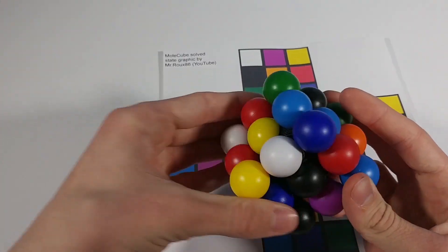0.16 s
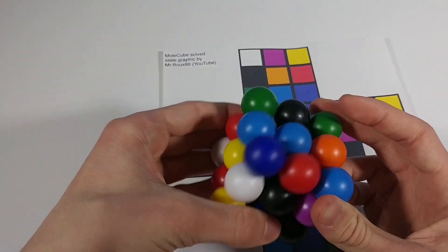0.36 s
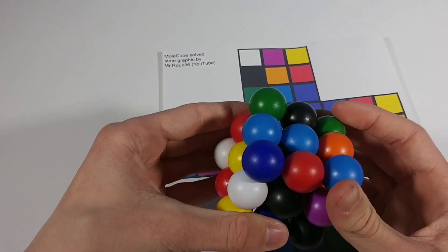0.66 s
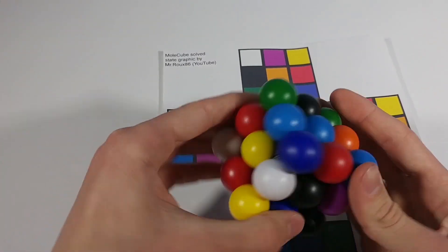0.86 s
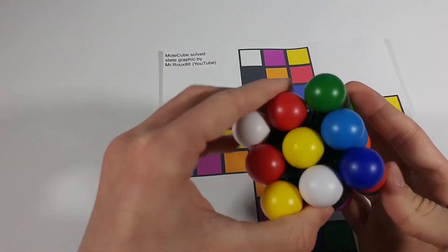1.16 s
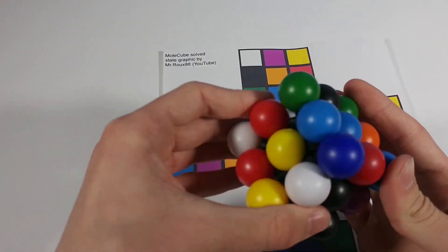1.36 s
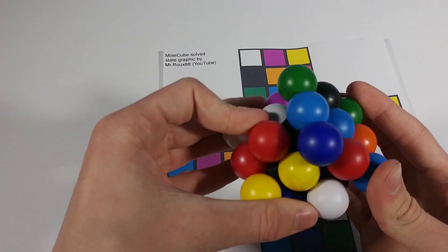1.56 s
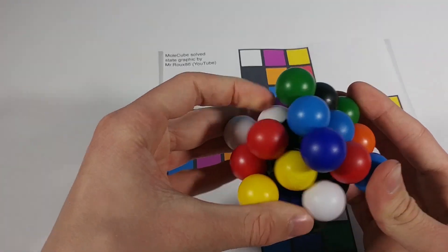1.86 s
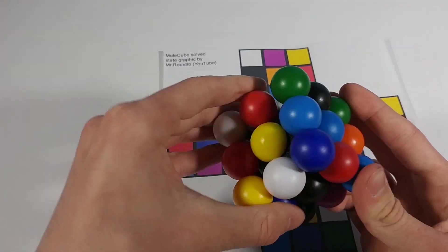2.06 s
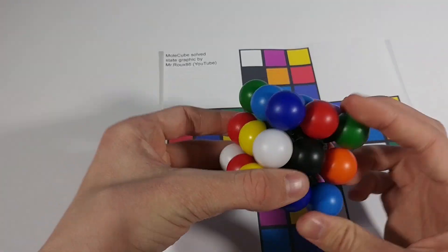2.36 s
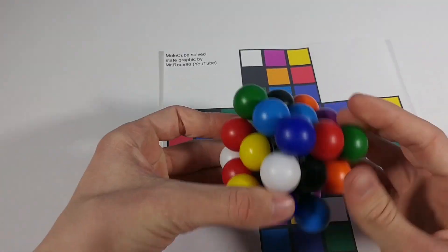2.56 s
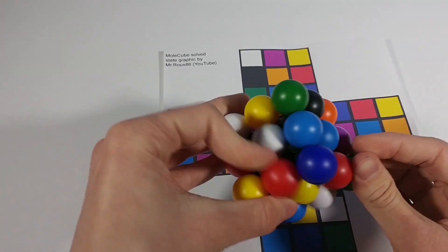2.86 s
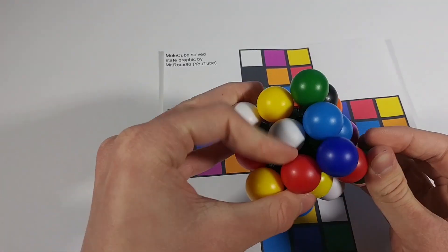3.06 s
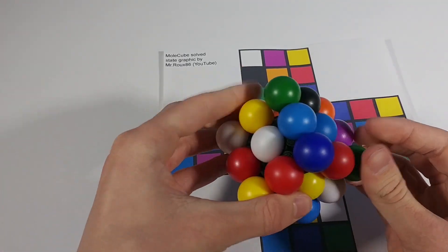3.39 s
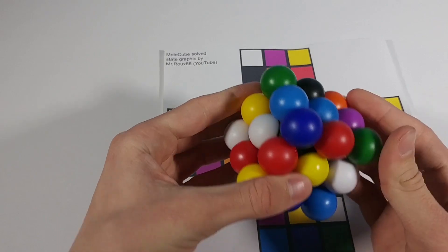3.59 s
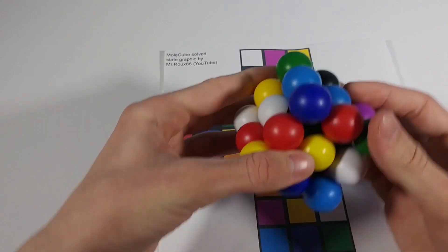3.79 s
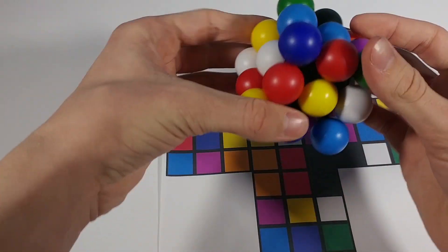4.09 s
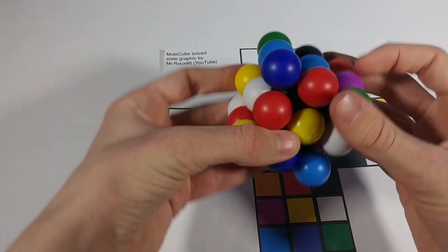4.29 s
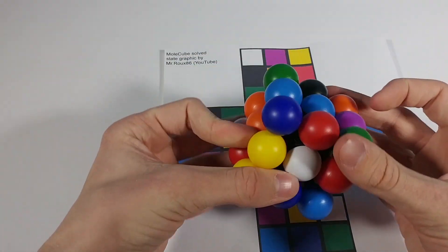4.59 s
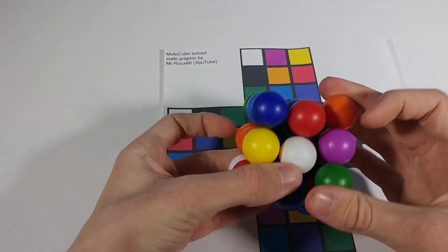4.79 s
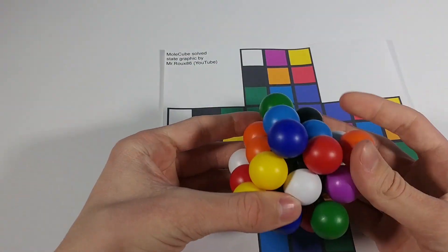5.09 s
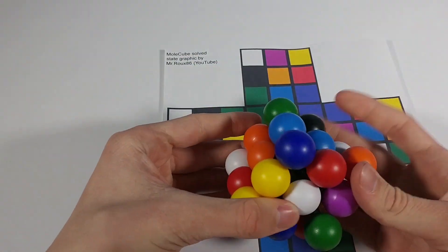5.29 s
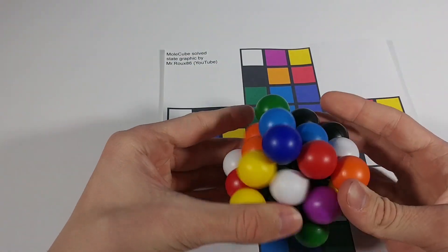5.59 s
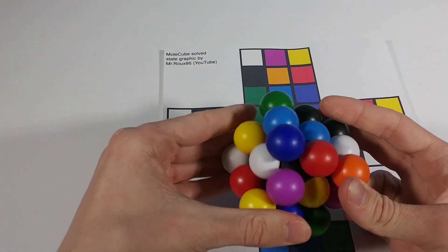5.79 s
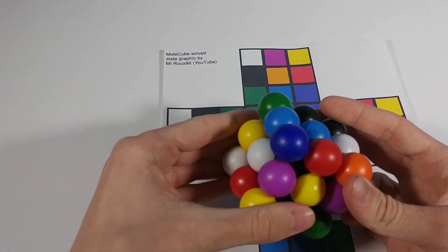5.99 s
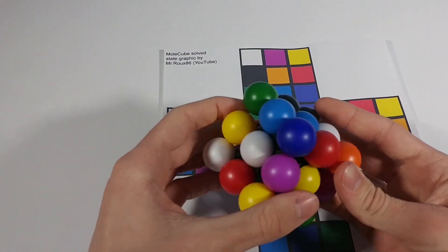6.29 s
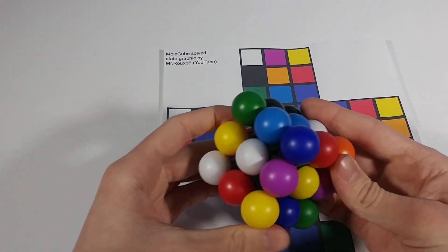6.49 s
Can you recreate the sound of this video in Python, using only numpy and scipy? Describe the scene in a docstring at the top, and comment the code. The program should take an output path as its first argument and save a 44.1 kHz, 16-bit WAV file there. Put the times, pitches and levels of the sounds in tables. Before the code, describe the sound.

Hands turn a puzzle of hollow plastic balls close to the microphone in a small room. Sharp double clicks and lighter ticks come in irregular bursts, densest around two to three seconds, then a lull with a skin-on-paper brush, a rattling cluster near four and a half seconds and a few later snaps. Low rumble swells under the first half.

```python
"""Twisty ball puzzle in two hands

A puzzle of hollow plastic balls is turned above a paper-covered table, close up in a small room. Turns end in
clusters of contacts: impacts plus chatter, filtered by hollow-ball resonances, with room echo. Between them,
shaped noise makes rubbing with tiny slips, grip bumps and short hisses, mostly skin on paper. Arm motion
rumbles table and stand in two low modes; fingertips thump; hiss and a faint hum lie below."""
import sys
import numpy as np
from scipy import signal
from scipy.fft import rfft, irfft, next_fast_len
from scipy.io import wavfile
from scipy.ndimage import map_coordinates

SR = 44100
rng = np.random.default_rng(int(sys.argv[2]) if len(sys.argv) > 2 else 0)


def generate_wav(signal):
    """Clip the signal to [-1, 1] and save it as 16-bit WAV at the path in sys.argv[1]."""
    frames = np.transpose(np.atleast_2d(signal))
    scaled = np.clip(frames, -1, 1) * 32767
    pcm = np.round(scaled).astype(np.int16)
    wavfile.write(sys.argv[1], SR, pcm)


N = 293265


def amp(db):
    """Decibels to gain."""
    return 10 ** (np.asarray(db) / 20)


def unit(x):
    """Scale to rms 1."""
    return x / np.sqrt(np.mean(np.abs(x) ** 2) + 1e-20)


def fade(t_s, t60_s):
    """Exponential decay, 60 dB down after t60_s."""
    return np.exp(-np.log(1000) * t_s / t60_s)


def along(points, hz):
    """(Hz, value) points interpolated on a log-frequency axis."""
    point_hz, values = np.transpose(points)
    return np.interp(np.log(hz + 1), np.log(point_hz + 1), values)


def curves(rows):
    """One value per sample for each column after the time."""
    time_s, *columns = np.transpose(rows)
    return [np.interp(np.arange(N) / SR, time_s, column) for column in columns]


def wobble(knots_per_s):
    """Smooth random curve through normally distributed knots."""
    knots = rng.standard_normal(int(N * knots_per_s / SR) + 4)
    return map_coordinates(knots, [np.arange(N) * knots_per_s / SR])


def filtered(x, response):
    """Apply response(hz) in the frequency domain."""
    size = next_fast_len(N + SR // 2)
    hz = np.fft.rfftfreq(size, 1 / SR)
    return irfft(rfft(x, size) * response(hz), size)[:N]


def coloured(x, spectrum):
    """x shaped by a (Hz, dB) spectrum, at rms 1."""
    return unit(filtered(x, lambda hz: amp(along(spectrum, hz))))


def causal(gain_db):
    """Minimum-phase response with these gains: rings only after the blow."""
    cepstrum = irfft(np.log(amp(gain_db)))
    half = len(cepstrum) // 2
    cepstrum[1:half] *= 2
    cepstrum[half + 1:] = 0
    return np.exp(rfft(cepstrum))


def add(track, time_s, sound):
    """Mix a sound into the track at time_s."""
    start = max(round(time_s * SR), 0)
    track[start:start + len(sound)] += sound[:len(track) - start]


# Tail decay of the room: (frequency [Hz], t60 [s])
ROOM_T60 = [(500, 0.61), (1300, 0.24), (4000, 0.26), (9000, 0.2), (15000, 0.19)]


def room(x, wet_db, early_db, early_t60_s, delay_s):
    """Direct sound, quick scatter from hands and table, then the walls' tail."""
    hz, frame_s, bins = signal.stft(rng.standard_normal(SR // 3), SR, nperseg=256)
    decay = fade(frame_s, along(ROOM_T60, hz)[:, None])
    tail = signal.istft(bins * decay, SR, nperseg=256)[1]
    t = np.arange(len(tail)) / SR
    tail = tail * np.clip(t / delay_s - 1, 0, 1)
    # cubed noise: a few strong reflections
    early = rng.standard_normal(len(t)) ** 3 * fade(t, early_t60_s)
    early = early * np.clip(2 * t / delay_s - 1, 0, 1)
    answer = amp(wet_db) * tail / np.linalg.norm(tail)
    answer = answer + amp(early_db) * early / np.linalg.norm(early)
    answer[0] = 1  # direct sound
    return signal.fftconvolve(x, answer)


def swing(centre_hz, width_hz):
    """Randomly pushed resonance at a nearly even amplitude, rms 1."""
    def band(hz):
        return 1 / (1 + (2 * (hz - centre_hz) / width_hz) ** 4)

    pushed = filtered(rng.standard_normal(N), band)
    phase = np.angle(signal.hilbert(pushed))
    return unit(filtered(np.cos(phase), lambda hz: np.sqrt(band(hz))))


# Arms' push on the support: (time [s], sway level [dB before trim], shudder level [dB before trim])
ARM_PUSH = [(0.0, -49.5, -49.5), (0.1, -39, -43.5), (0.33, -37, -48.5), (0.52, -43, -46),
            (0.62, -47.5, -60), (1.22, -51.5, -64.5), (1.31, -66.5, -74), (1.5, -48, -50), (1.68, -66, -59),
            (1.95, -45.5, -52), (2.27, -40, -48.5), (2.58, -38.5, -46), (2.98, -43, -57), (3.15, -51, -63),
            (3.6, -51.5, -66.5), (4.1, -67, -65), (5.0, -70, -67.5), (6.65, -62.5, -70)]
# Wrist jolts ringing the stand: (time [s], level [dB before ring envelope])
JOLTS = [(0.422, -36.5), (1.172, -42), (1.492, -36), (2.668, -29.5), (2.941, -35), (3.572, -45.5),
         (4.411, -44), (5.068, -39), (6.6, -52)]
SWAY_HZ, SWAY_WIDTH_HZ = 28.96, 13
SHUDDER_HZ, SHUDDER_WIDTH_HZ = 57, 11.2
SURGE_DB, SURGE_KNOTS_PER_S = 4.5, 13  # uneven push: standard deviation at knots, knot rate
JOLT_RISE_S, JOLT_T60_S = 0.017, 0.32


def rumble(sway_trim_db, shudder_trim_db):
    """Table and stand shake in two low modes as the arms move; jolts ring the upper one."""
    sway_db, shudder_db = curves(ARM_PUSH)
    surges = amp(SURGE_DB * wobble(SURGE_KNOTS_PER_S))
    sway = amp(sway_db + sway_trim_db) * swing(SWAY_HZ, SWAY_WIDTH_HZ)
    shudder = amp(shudder_db + shudder_trim_db) * swing(SHUDDER_HZ, SHUDDER_WIDTH_HZ)
    shake = surges * (sway + shudder)
    t = np.arange(SR // 2) / SR
    envelope = fade(t, JOLT_T60_S) * (1 - np.exp(-t / JOLT_RISE_S))
    ring = np.sin(2 * np.pi * SHUDDER_HZ * t) * envelope
    for time_s, db in JOLTS:
        add(shake, time_s, amp(db) * ring)
    return shake


# Fingers and parts rubbing: (time [s], level [dB before trim])
RUB = [(0.0, -64), (0.2, -83), (0.36, -69.5), (0.52, -82), (0.75, -77.5), (1.1, -87.5), (1.75, -82.5),
       (1.98, -70.5), (2.35, -68.5), (2.8, -75), (3.05, -85), (4.15, -81), (4.47, -66.5), (4.9, -81),
       (5.4, -78), (5.72, -68.5), (6.1, -83), (6.65, -76.5)]
# Rubbing colour: (frequency [Hz], relative density [dB per Hz])
RUB_COLOUR = [(100, -15), (400, -7.5), (800, -3), (1300, 5), (1850, -2.5), (2400, 1.5), (3100, -7),
              (3900, 0), (5000, -10.5), (7000, -7), (11000, -13), (16000, -17.5)]


def rubbing(trim_db, slips_per_s, slip_db, uneven_db, ride_db, ride_t60_s):
    """Balls slide on the core: soft scrape with tiny stick-slip ticks."""
    rub_db, = curves(RUB)
    # friction power builds as a ball rides up the lip of its seat, just before it drops in
    ride_power = np.zeros(N)
    before_s = np.arange(SR // 10, 0, -1) / SR
    for time_s, db, *_ in SNAPS:
        lead_s = before_s[before_s < time_s]
        ride = amp(db + ride_db) * fade(lead_s, ride_t60_s)
        add(ride_power, time_s - len(lead_s) / SR, ride ** 2)
    slips = (rng.random(N) < slips_per_s / SR) * rng.uniform(0.21, 1, N)
    slips = room(slips, wet_db=-14.0, early_db=2, early_t60_s=0.027, delay_s=0.00095)[:N]
    scrape = rng.standard_normal(N) * amp(uneven_db * wobble(45))
    pressure = np.sqrt(amp(rub_db + trim_db) ** 2 + ride_power)
    return pressure * coloured(unit(scrape) + amp(slip_db) * unit(slips), RUB_COLOUR)


# Firmness of the grip: (time [s], level [dB before trim])
GRIP = [(0.0, -69), (0.12, -75), (0.76, -84.5), (1.75, -80), (2.1, -74), (2.42, -79), (2.85, -74),
        (3.05, -85.5), (3.95, -78), (4.6, -85), (4.78, -71), (5.1, -78.5), (6.2, -83), (6.65, -70)]
# Palm colour: (frequency [Hz], relative density [dB per Hz])
PALM_COLOUR = [(30, -24.5), (70, -7.5), (110, 2.5), (170, -9), (300, -11), (600, -22), (1200, -21.5),
               (4000, -74)]


def grip(trim_db, uneven_db):
    """Fingers shift their hold: dull, soft bumps of unevenly swelling noise."""
    grip_db, = curves(GRIP)
    bumps = rng.standard_normal(N) * amp(uneven_db * wobble(30))
    return amp(grip_db + trim_db) * coloured(bumps, PALM_COLOUR)


# Still-room colour: (frequency [Hz], relative density [dB per Hz])
AIR_COLOUR = [(35, -31.5), (60, 2), (83, -8.5), (113, -21), (176, -20.5), (492, -27.5), (621, -27.5),
              (1170, -31), (3120, -42.5), (3940, -37.5), (8320, -41.5), (11500, -42), (16000, -57)]
# Faint appliance tone: (frequency [Hz], level [dB])
HUM = (490, -91.5)


def still_room(air_db):
    """Steady noise and a faint hum with slowly wandering phase."""
    hum_hz, hum_db = HUM
    phase = 2 * np.pi * hum_hz * np.arange(N) / SR + 0.31 * wobble(2)
    hum = unit(np.sin(phase))
    return amp(air_db) * coloured(rng.standard_normal(N), AIR_COLOUR) + amp(hum_db) * hum


# Broad colour of a struck ball: (frequency [Hz], relative density [dB per Hz])
PLASTIC_COLOUR = [(100, -22.5), (400, -21), (850, -18.5), (1150, -10), (1900, -10.5), (2500, -6.5),
                  (3100, -11), (5100, -7.5), (6100, -4.5), (7200, -0.5), (9200, -5), (11000, -10),
                  (14500, -13.5), (16500, -26)]
# Ball resonances before detuning: (centre [Hz], width [Hz], lift [dB])
BALL_MODES = [(1303, 530, 8), (3930, 980, 9.5), (6750, 320, 6), (10020, 290, 6.5)]
# Low-knock tint: (frequency [Hz], share of knock dB [0-1])
KNOCK_SHAPE = [(500, 0.72), (1300, 1.0), (2600, 0.71), (4500, 0.14), (7000, 0.035)]
# Hollow-ring tint: (frequency [Hz], share of ring dB [0-1])
RING_SHAPE = [(2600, 0.0), (3900, 0.91), (5200, 0.4), (7000, 0.0)]
# Hard-edge tint: (frequency [Hz], share of edge dB [0-1])
EDGE_SHAPE = [(7000, 0.0), (11500, 1.0)]
BLOW_DB, CHATTER_T60_S = 10, 0.012  # first impact over initial chatter rms; chatter decay
DETUNE = 0.014  # tuning spread, standard deviation as a fraction


def contact(knock_db, ring_db, edge_db, size=2048):
    """Hard impact and milliseconds of chatter ring a hollow ball, tuned afresh at each contact."""
    t = np.arange(size) / SR
    hz = np.fft.rfftfreq(size, 1 / SR)
    chatter = rng.standard_normal(size) * fade(t, CHATTER_T60_S)
    chatter[0] = amp(BLOW_DB)
    own_hz = hz * (1 + DETUNE * rng.standard_normal())
    modes_db = sum(lift_db / (1 + (2 * (own_hz - centre_hz) / width_hz) ** 2)
                   for centre_hz, width_hz, lift_db in BALL_MODES)
    tint_db = knock_db * along(KNOCK_SHAPE, hz)
    tint_db = tint_db + ring_db * along(RING_SHAPE, hz) + edge_db * along(EDGE_SHAPE, hz)
    colour = causal(along(PLASTIC_COLOUR, hz) + modes_db + tint_db)
    sound = irfft(rfft(chatter) * colour)
    # energy of 3 ms at rms 1
    return sound * np.sqrt(0.003 * SR) / np.linalg.norm(sound)


def strike(db, knock_db, ring_db, edge_db):
    """One contact with its own answer from the room."""
    dry_contact = contact(knock_db, ring_db, edge_db)
    return amp(db) * room(dry_contact, wet_db=-5.0, early_db=-4.5, early_t60_s=0.018, delay_s=0.0021)


# Single ball-on-ball ticks: (time [s], level [dB before trim], low knock [dB])
TICKS = [(0.0064, -49.5, 3), (0.158, -53.5, 29), (0.2515, -64, 26), (0.3448, -59.5, 3), (0.382, -61, 4),
         (0.41, -56.5, 11), (0.6517, -69, 7), (0.8781, -60, 15), (0.9374, -61.5, 18), (1.261, -66, 29),
         (1.4355, -58.5, 15), (1.4437, -50, -5.5), (1.662, -58, 11), (1.854, -63, 8), (1.9604, -50.5, 3.5),
         (2.1278, -45.5, -2), (2.304, -52, 9), (2.476, -50, -13), (2.6564, -63, 30), (2.6956, -66, 20),
         (2.727, -48, 17), (2.815, -54.5, 5), (2.864, -44, -5), (3.0572, -68, 16), (3.1, -69, 14.5),
         (3.2142, -62, 10.5), (3.4427, -65, 23), (4.0212, -67, 27), (4.0733, -63, 13), (4.0842, -55, 21),
         (4.0982, -55, 14.5), (4.1308, -50.5, -4), (4.1623, -61, 10), (4.239, -69, 22), (4.2765, -48.5, -3),
         (4.516, -40, -17), (4.799, -55.5, 13), (5.038, -62.5, 11), (5.169, -50.5, 10), (5.1972, -62.5, 20),
         (5.3097, -66, 19), (5.3806, -68, 14), (5.4912, -41, -9), (5.621, -54, 17), (5.6318, -44.5, -9),
         (5.7367, -54, 11), (5.766, -56.5, 13), (5.8782, -42, -19), (6.0353, -65, 30), (6.32, -65.5, 10.5)]
TICK_RING_DB, RING_PER_KNOCK, TICK_EDGE_DB = 1.5, 0.28, -2.5  # a duller tick is also hollower
# faint loose-ball ticks; levels before trim
STRAYS_PER_S, STRAY_MEAN_DB, STRAY_SPREAD_DB, STRAY_KNOCK_DB = 5, -70.5, -3, 16.5


def ticking(trim_db, count=100):
    """Balls tick against their neighbours; loose ones add faint ticks at random."""
    track = np.zeros(N)
    times_s = np.cumsum(rng.exponential(1 / STRAYS_PER_S, count))
    levels_db = STRAY_MEAN_DB + STRAY_SPREAD_DB * rng.standard_normal(count)
    strays = [(time_s, db, STRAY_KNOCK_DB) for time_s, db in zip(times_s, levels_db) if time_s < N / SR]
    for time_s, db, knock_db in TICKS + strays:
        ring_db = TICK_RING_DB + RING_PER_KNOCK * knock_db
        add(track, time_s, strike(db + trim_db, knock_db, ring_db, TICK_EDGE_DB))
    return track


# A layer snaps home, two balls seating in turn:
# (time [s], first ball level [dB before trim], gap [s], second ball level [dB before trim],
#  low knock [dB], hollow ring [dB], hard edge [dB])
SNAPS = [(0.0278, -39.5, 0.0017, -30.5, -11, -4.5, 1.5), (0.089, -36, 0.0048, -33.5, -11.5, -5.5, 3),
         (0.4245, -39, 0.0044, -38, -11.5, -10, 2), (1.13, -36, 0.0058, -38.5, -15, -12, 2),
         (1.4582, -38.5, 0.0054, -37.5, -12, -10, -0.5), (2.022, -40, 0.006, -39.5, -16.5, -5, 1),
         (2.1299, -35.5, 0.0058, -32.5, -11.5, -10, 1), (2.2131, -49.5, 0.003, -41.5, 0, 0, 5.5),
         (2.3612, -35, 0.0022, -38.5, -10.5, -1.5, 2.5), (2.4944, -35.5, 0.0017, -43, -2.5, 4, 4),
         (2.74, -39, 0.0081, -42, -8, 2.5, 3.5), (2.8827, -31, 0.003, -43, -10, -1, 5),
         (2.8951, -43.5, 0.0032, -36.5, -5, 12, 6.5), (4.286, -38, 0.0019, -33, 9.5, 6, 5),
         (4.414, -37.5, 0.0037, -38.5, -2, 6, 5), (4.4636, -42.5, 0.0038, -38.5, 4.5, 9, -2),
         (4.473, -44, 0.007, -42, 10, -5, -9), (4.489, -32.5, 0.0019, -36, -6, 3.5, 2.5),
         (4.5008, -40, 0.0068, -40.5, -17, 5, 3), (4.6472, -50, 0.0106, -45.5, 5, 1, -4),
         (4.67, -40.5, 0.006, -49, -4, -5, -5), (5.4978, -36, 0.0059, -42, -9.5, 0, -1),
         (5.6373, -39.5, 0.0057, -38, -9.5, 0.5, 2.5), (5.8597, -38, 0.0094, -37.5, -7.5, 1.5, 1),
         (6.428, -39, 0.0039, -35.5, -10, -9, -3), (6.4339, -37, 0.0012, -38, -15.5, 8, 4)]
SETTLE_MEAN_S, SETTLE_DB = 0.0072, -18  # bounce after the second blow: mean delay, relative level


def clicks(trim_db):
    """Sprung balls snap into seats: one seats, a second follows and bounces once."""
    track = np.zeros(N)
    for time_s, first_db, gap_s, second_db, *tint_db in SNAPS:
        settle_s = gap_s + SETTLE_MEAN_S * rng.uniform(0.6, 1.4)
        blows = [(0, first_db), (gap_s, second_db), (settle_s, second_db + SETTLE_DB)]
        for after_s, db in blows:
            add(track, time_s + after_s, strike(db + trim_db, *tint_db))
    return track


# Fingertips landing on the balls: (time [s], level [dB before trim])
THUMPS = [(0.086, -73), (0.25, -67.5), (0.425, -66), (2.211, -62), (2.334, -73), (2.485, -63.5),
          (2.734, -65.5), (3.26, -69.5), (3.755, -72), (4.48, -68), (4.657, -64), (4.747, -64.5),
          (4.799, -73), (5.693, -67.5), (6.196, -71)]
# Fingertip's dull knock: (frequency [Hz], relative density [dB per Hz])
PAD_COLOUR = [(40, -24), (100, -11.5), (240, -4), (450, -10), (800, -6.5), (1500, -18), (4000, -36),
              (9000, -50)]


def thumps(t60_s, rise_s, size=4096):
    """Soft fingertips knock the puzzle without ringing it: short, dull noise bursts."""
    track = np.zeros(N)
    t = np.arange(size) / SR
    colour = causal(along(PAD_COLOUR, np.fft.rfftfreq(size, 1 / SR)))
    for time_s, db in THUMPS:
        push = rng.standard_normal(size) * fade(t, t60_s) * (1 - np.exp(-t / rise_s))
        add(track, time_s, amp(db) * unit(irfft(rfft(push) * colour)))
    return track


# Short hissing bursts; from the second row on, skin sliding on paper. (start [s], end [s], level before
# unevenness [dB])
HISSES = [(0.65, 0.825, -76.5), (3.436, 3.728, -79), (3.686, 3.916, -61.5), (4.69, 4.863, -74.5),
          (5.163, 5.418, -75), (6.054, 6.258, -80.5), (6.567, 6.70, -75)]
# Colour shared by all rows: (frequency [Hz], relative density [dB per Hz])
HISS_COLOUR = [(100, -21), (220, 0.5), (400, -11), (800, -1), (1300, -1.5), (2800, -13), (4000, -9),
               (5500, -11), (11000, -4.5), (15500, -5), (17000, 0.5)]


def hisses(ramp_s, uneven_db):
    """Short, uneven bursts of shaped noise; all but the first are skin sliding on paper."""
    t = np.arange(N) / SR
    bursts = sum(amp(db) * np.clip(np.minimum(t - start_s, end_s - t) / ramp_s, 0, 1)
                 for start_s, end_s, db in HISSES)
    unevenness = amp(uneven_db * wobble(50))
    return bursts * unevenness * coloured(rng.standard_normal(N), HISS_COLOUR)


def scene():
    """Puzzle, hands, hisses, support and room summed to one channel."""
    support = rumble(sway_trim_db=-0.5, shudder_trim_db=-1.0)
    friction = rubbing(trim_db=-0.5, slips_per_s=70, slip_db=1.5, uneven_db=5,
                       ride_db=-31.5, ride_t60_s=0.09)
    hands = grip(trim_db=1.0, uneven_db=3.0)
    hands = hands + amp(-10.0) * thumps(t60_s=0.12, rise_s=0.00091)
    short_hisses = hisses(ramp_s=0.032, uneven_db=1.6)
    puzzle = ticking(trim_db=-1.0) + clicks(trim_db=-1.0)
    return (support + friction + hands + short_hisses + puzzle + still_room(air_db=-73.0))[None]


TOP_HZ = 15850  # half gain here


def record(dry):
    """Very steep low-pass at the upper band limit."""
    return filtered(dry[0], lambda hz: 1 / (1 + (hz / TOP_HZ) ** 120))[None]


dry = scene()
out = record(dry)
generate_wav(out)
```